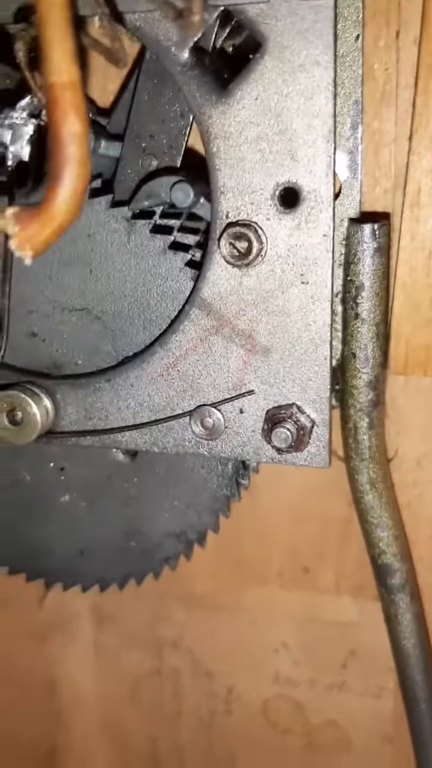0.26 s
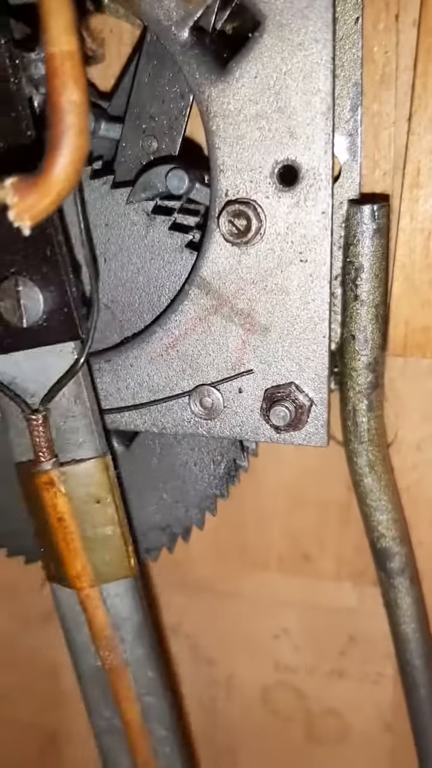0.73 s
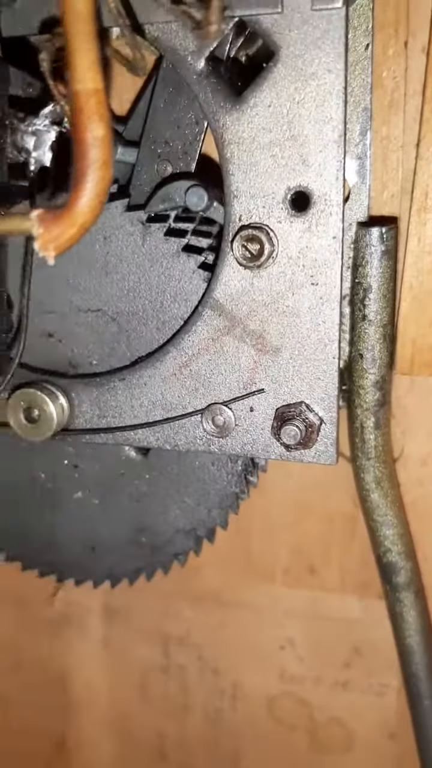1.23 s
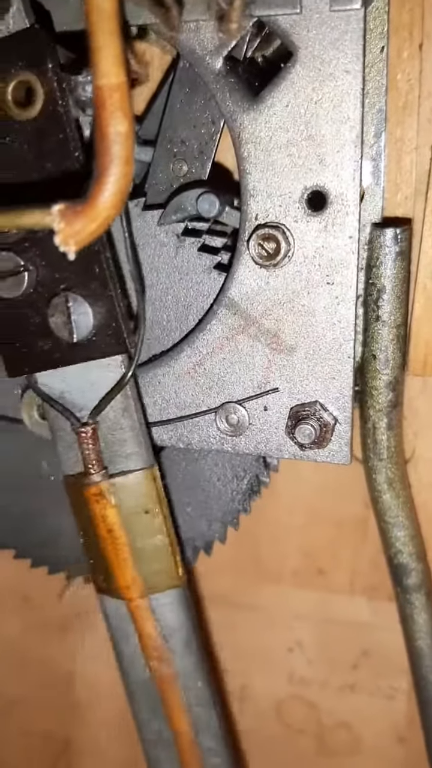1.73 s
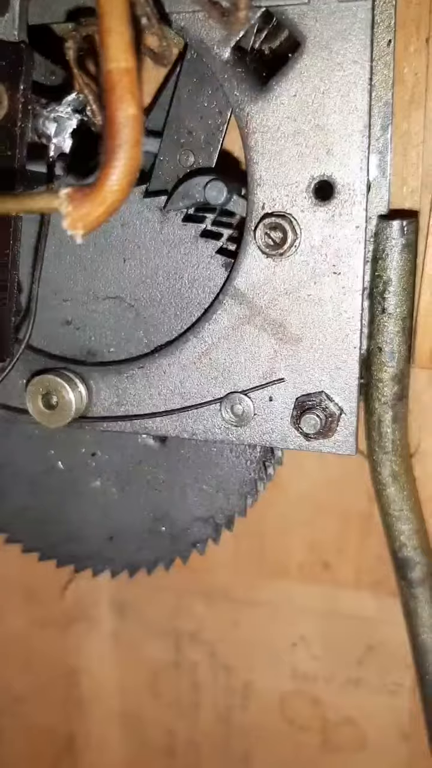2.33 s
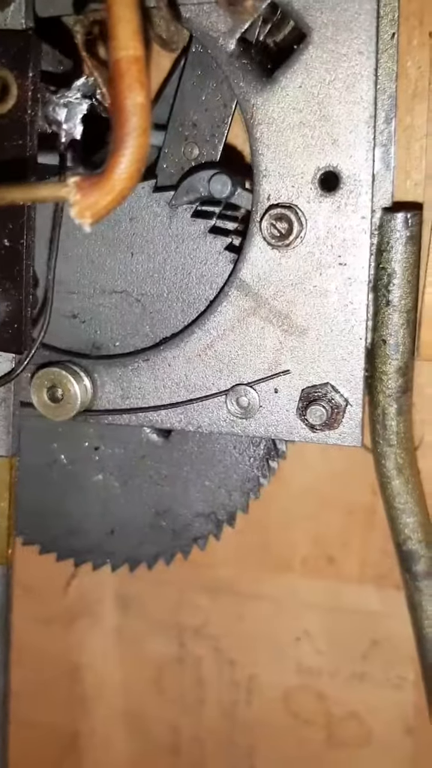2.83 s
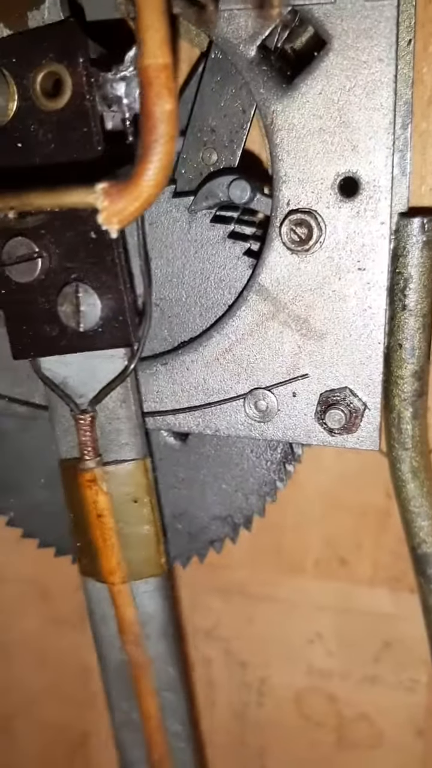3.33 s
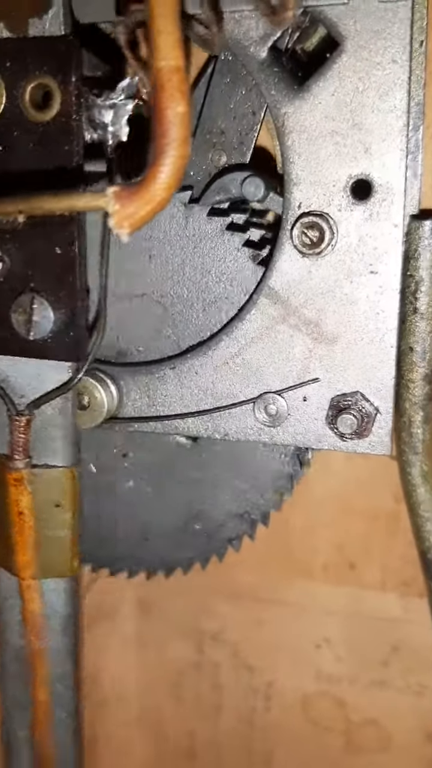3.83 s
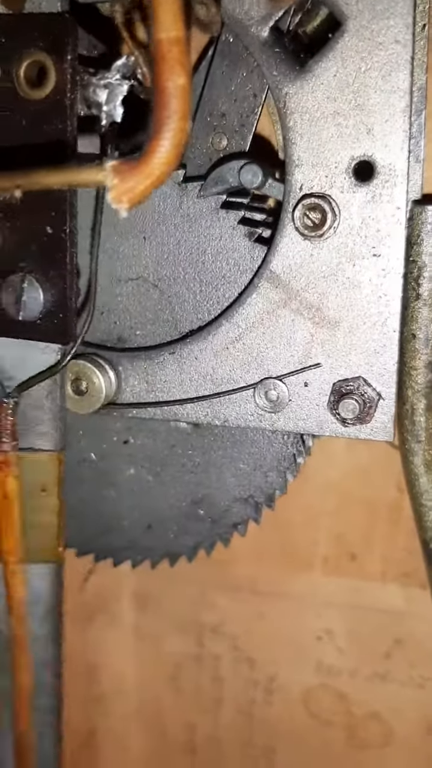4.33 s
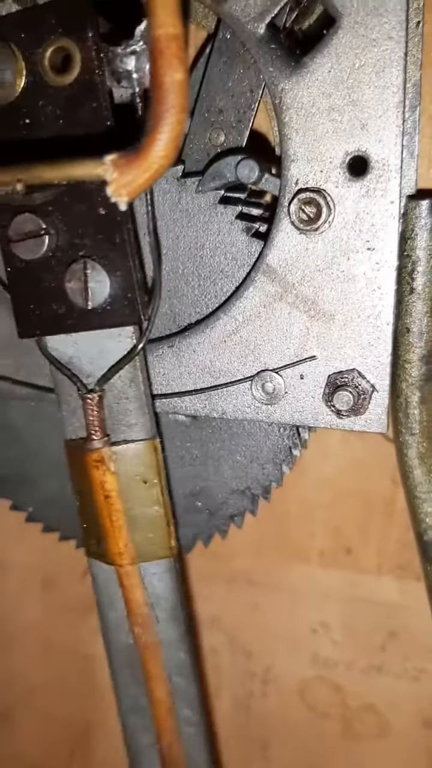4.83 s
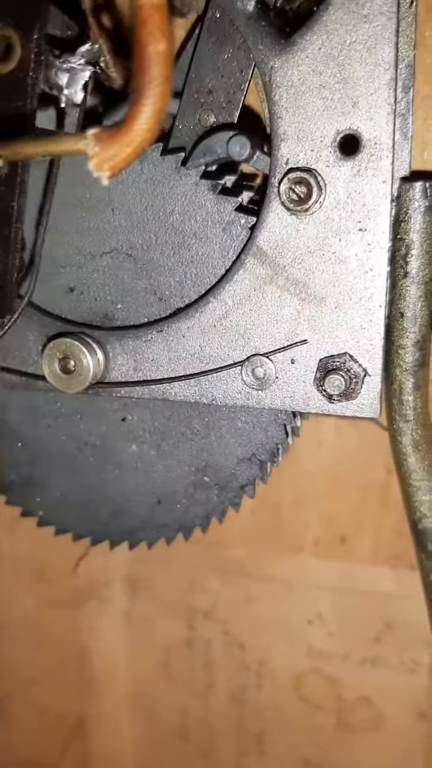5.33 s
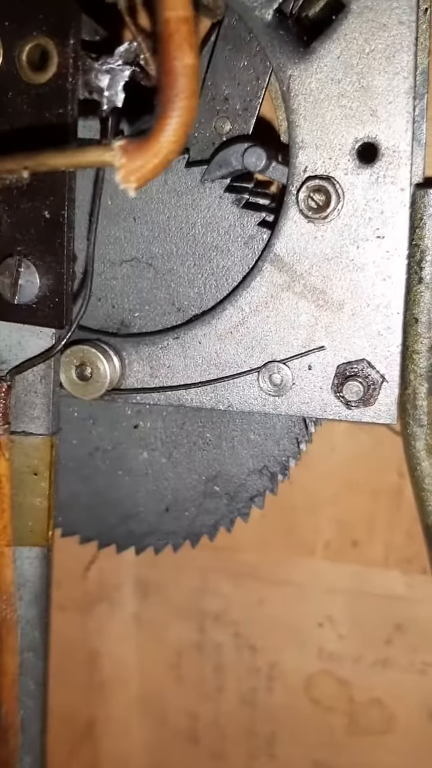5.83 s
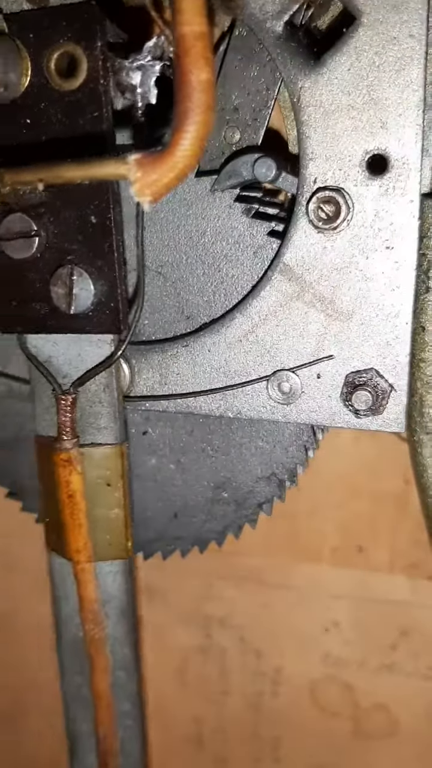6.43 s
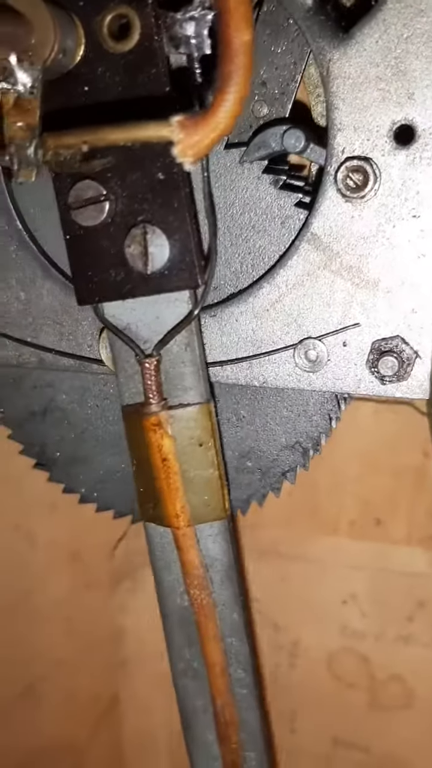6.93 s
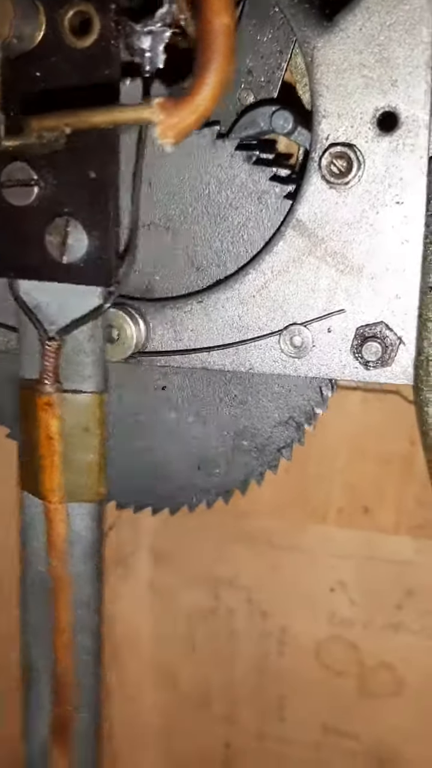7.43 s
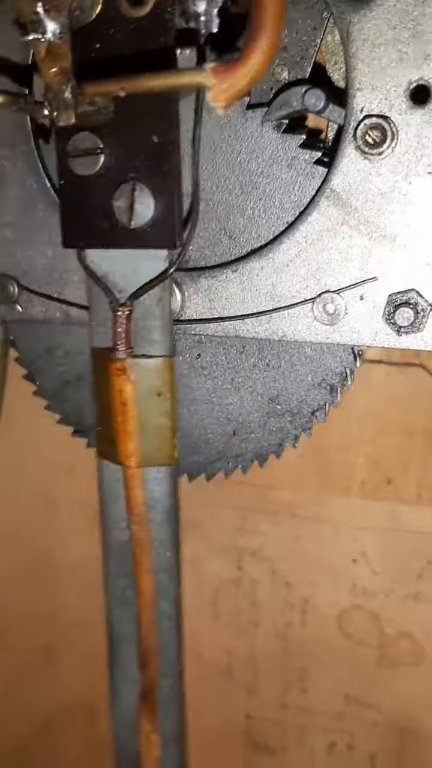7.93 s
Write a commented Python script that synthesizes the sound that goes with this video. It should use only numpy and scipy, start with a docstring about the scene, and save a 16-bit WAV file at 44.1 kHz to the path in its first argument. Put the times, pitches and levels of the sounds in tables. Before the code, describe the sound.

A clock mechanism of steel levers on a wooden backboard, heard very close with a short room answer. Light clicks, hollow tocks, low case booms and high pawl pings fall irregularly over constant airy hiss. Other clocks tick faintly behind. Sparse at first, busier after two seconds, dominated by three sharp cracks between three and four and a half seconds, then sparse again near the end.

```python
"""First a steady hiss and the short scrape of an arm, with a quick clock ticking faintly across the room.
Then an old electric pendulum clock, close up: levers click on steel and knock the wooden backboard, the case
scuffs and booms, hollow tocks come through, a pawl snaps and pings, and an arm clacks on its stop and rattles.
Noisy contact forces or brief blows ring banks of resonances; the ping and the booms are decaying sines.
Two microphones hear it all, with three other clocks beating across the room and furthest works whispering."""
import sys
import numpy as np
from scipy import signal
from scipy.fft import rfft, irfft, next_fast_len
from scipy.io import wavfile
from scipy.ndimage import map_coordinates

SR = 44100
rng = np.random.default_rng(int(sys.argv[2]) if len(sys.argv) > 2 else 0)


def wrap_up_sound(samples):
    """Save the sound to the file named by the first command line argument, as 16-bit audio."""
    columns = np.atleast_2d(samples).T
    # keep every value between -1 and 1, then stretch to whole-number steps
    tamed = np.clip(columns, -1, 1)
    steps = np.round(tamed * 32767).astype(np.int16)
    wavfile.write(sys.argv[1], SR, steps)


N = 360297
T = np.arange(SR // 3) / SR  # time within one sound (s)

# Room air and microphone hiss. Each row: frequency in Hz, relative density in dB.
HISS_SPECTRUM = [(25, -20), (100, -14), (260, -11.5), (450, -8), (590, 1.5), (700, -4.5), (1250, 1.5),
                 (1470, 0), (1550, 9), (1640, 1), (2150, 5.5), (2900, 3), (5700, 4), (7600, -1),
                 (8830, -12.5), (12500, -9.5), (15800, -8.5)]
# Balance of the hiss between the microphones. Each row: frequency in Hz, left minus right in dB.
HISS_BALANCE = [(60, 0), (200, -10), (400, -3.5), (1300, -7.5), (2400, -6.5), (4400, -10), (8100, -4.5),
                (15000, -2.5)]
# Balance of the contacts between the microphones. Each row: frequency in Hz, left minus right in dB.
CONTACT_BALANCE = [(130, -1.5), (230, -3), (420, 3.5), (1000, -5.5), (2000, -7), (4200, -11.5), (8500, -1),
                   (13000, -4.5)]
# Likeness of the two microphones. Each row: frequency in Hz, correlation from -1 to 1.
MIC_LIKENESS = [(60, 0.7), (200, 0.95), (420, 0.72), (750, 0.4), (1300, -0.35), (2400, 0.036),
                (4400, -0.056), (15000, -0.036)]
# Scrapes: the arm, and at 6.613 s and 6.74 s the pawl sliding on after its drops. Each row: start in seconds,
# level in dB, length in seconds, brightness in dB.
SCRAPES = [(0, -34, 0.05, 4.5), (2.074, -32, 0.045, 7.5), (6.613, -44, 0.02, 14), (6.74, -44.5, 0.019, 35),
           (7.414, -35, 0.059, 7), (8.047, -42, 0.038, 2.5)]
# Resonances of the scraping parts. Each row: frequency in Hz, width in Hz, level in dB.
SCRAPE_MODES = [(363, 66, -3), (556, 58, 0), (806, 360, -8.5), (1294, 72, -3), (1514, 30, 3), (2050, 200, -26)]
# Ticks of the quick clock. Each row: frequency in Hz, width in Hz, level in dB.
QUICK_MODES = [(1525, 59, 10.5), (2438, 38, 16.5), (2640, 13, 9.5), (3433, 40, 15), (3630, 2000, 1.5),
               (5520, 340, 7), (5910, 53, 15.5), (7290, 160, 8), (7920, 65, 9)]
# Steel works heard from afar. Each row: frequency in Hz, width in Hz, level in dB.
FAR_MODES = [(1535, 63, 7.5), (2070, 570, 9.5), (4020, 1000, 7.5), (5700, 990, 11)]
# Ticks of the small clock. Each row: frequency in Hz, width in Hz, level in dB.
SMALL_MODES = [(1534, 13, 17), (3520, 77, 4), (5800, 710, 5)]
# Whispers of the furthest works. Each row: start in seconds, level in dB.
WHISPERS = [(0.68, -45), (1.3, -41), (1.54, -42.5), (1.73, -43), (1.839, -43), (2.28, -42.5), (2.35, -42),
            (2.586, -44), (4.485, -38.5), (4.869, -44), (6.19, -44.5), (7.09, -49), (7.91, -41)]
# Low booms of the back panel. Each row: start in seconds, level in dB, note in Hz, length in seconds.
BUMPS = [(0.049, -34, 205.5, 0.066), (0.157, -41.5, 220, 0.11), (0.316, -48, 228, 0.09),
         (0.393, -37, 120, 0.056), (2.232, -48.5, 203, 0.058), (3.757, -27, 169, 0.055),
         (4.007, -43, 214, 0.071), (4.381, -33, 119.5, 0.065), (4.405, -37, 208, 0.055),
         (4.571, -41, 203, 0.087), (5.379, -41.5, 199, 0.083), (5.661, -34.5, 178, 0.064),
         (7.263, -66, 203, 0.12), (7.58, -40, 230, 0.071), (7.689, -50, 205, 0.1), (7.787, -41, 208, 0.1)]
# Resonances of the wooden case. Each row: frequency in Hz, width in Hz, level in dB.
CASE_MODES = [(53.6, 6.5, -8.5), (92.5, 21, -5), (123, 15.4, 1.5), (183, 28.7, 5.5), (211.7, 43.3, 4.5),
              (244.5, 24.7, 1), (281.7, 9.2, -5), (346.7, 67, 1.5), (502.5, 9.7, -7.5)]
# Resonances of the backboard. Each row: frequency in Hz, width in Hz, level in dB.
BOARD_MODES = [(574, 65, 11), (694, 72, 5), (770, 132, 7.5), (868, 87, 10), (944, 26, 5), (1172, 95, 3.5),
               (1311, 29, 8.5), (1488, 61, 8), (1562, 36, 5.5), (1940, 300, -1), (2280, 74, -6),
               (2830, 110, -2.5)]
# What a light touch stirs in case and board. Each row: frequency in Hz, gain in dB.
LIGHT_TOUCH = [(80, -4), (125, -0.5), (170, -2.5), (220, 3), (300, -0.5), (420, -3), (600, 2.5),
               (1550, 0.5), (2100, -1), (3500, 8)]
# Lever contacts, and at 2.113 s and 7.469 s the scraping arm coming to rest. Each row: start in seconds, #
# steel click in dB, board knock in dB, case thud in dB, knock brightness in dB, time to the rebound in seconds.
CONTACTS = [(0.157, -51, -51, -46, -7, 0.0062), (0.386, -37, -35.5, -32.5, -6.5, 0.0067),
            (0.785, -50, -40.5, -41, 5, 0.0048), (1.7918, -45.5, -42, -40.5, -8.5, 0.0064),
            (2.077, -62, -54, -49, 14, 0.0089), (2.113, -60, -54, -49, -21, 0.018),
            (2.211, -51, -48, -54, 1, 0.0094), (2.492, -27, -31.5, -39, 0.5, 0.0051),
            (2.503, -32, -47, -39.5, 0, 0.0086), (2.529, -52, -41, -30.5, -11, 0.011),
            (2.5497, -43, -29, -37, 1, 0.0045), (2.56, -37, -32, -38, -9, 0.0065),
            (2.591, -50, -45, -42.5, 5, 0.0058), (3.0844, -36, -34.5, -36.5, 7, 0.0044),
            (3.0919, -36.5, -36, -36, -17, 0.0044), (3.7506, -28, -28.5, -31.5, -2, 0.0027),
            (3.8, -49, -42, -39, 8, 0.0062), (3.819, -56, -38.5, -37.5, -12, 0.0059),
            (3.836, -60, -37, -36, -17, 0.014), (3.904, -51, -58, -38, -8, 0.019),
            (3.991, -55, -47, -55, -1, .012), (4.3776, -27, -30, -32.5, -9, 0.006),
            (4.963, -46.5, -37.5, -36.5, -2.5, 0.0064), (5.376, -64, -53, -70, -12, .012),
            (5.574, -21, -27.5, -29.5, -4, 0.005), (5.589, -33, -32, -34, -3, 0.0035),
            (5.626, -32.5, -31.5, -32, -6, 0.0027), (5.637, -36, -29.5, -44, -7, .005),
            (5.687, -31.5, -36.5, -36.5, 0, 0.0058), (5.699, -52, -36.5, -32, -2, 0.0066),
            (5.762, -47, -59, -45, -8, .012), (7.469, -47, -41.5, -47, -11, 0.01),
            (7.575, -51, -45.5, -49, -2, 0.011), (7.873, -40, -34.5, -35.5, 2, 0.0078)]
# Resonances of the steel frame. Each row: frequency in Hz, width in Hz, level in dB.
FRAME_MODES = [(2340, 520, 7.5), (2700, 65, 9), (3870, 375, 13.5), (4650, 240, 13.5), (5410, 610, 12.5),
               (6660, 650, 13.5), (7500, 1660, 8), (11400, 400, -12), (10700, 930, -24), (13300, 1600, 2),
               (14400, 490, 6.5)]
# What the board radiates of a knock. Each row: frequency in Hz, gain in dB.
BOARD_RADIATION = [(450, -4.0), (800, 3.0), (1250, 5.5), (1600, 5.5), (2300, 1.0), (5000, 11)]
# Soft scuffs of the case. Each row: start in seconds, board level in dB, case level in dB, length in seconds.
SCUFFS = [(0.335, -53, -46.5, 0.05), (1.037, -56, -49, 0.041), (1.449, -46.5, -50, 0.089),
          (1.864, -54.5, -47.5, 0.063), (2.758, -61, -49.5, 0.089), (3.21, -47.5, -40, 0.041),
          (3.282, -45, -43, 0.067), (3.801, -45, -41, 0.06), (3.91, -47.5, -47, 0.04),
          (4.548, -50, -44.5, 0.054), (5.486, -42.5, -47, 0.081), (5.65, -49, -42, .055),
          (5.748, -59, -42, 0.066), (5.926, -58, -41, 0.035), (5.973, -43.5, -55.5, 0.027),
          (6.089, -50.5, -38.5, 0.083), (6.329, -57, -50.5, 0.043), (7.438, -42.5, -41.5, 0.082),
          (8.086, -44.5, -46.5, 0.066)]
# Soft hollow tocks. Each row: start in seconds, level in dB.
TOCKS = [(0.516, -48.5), (1.439, -39.5), (3.485, -50.5), (5.485, -45), (6.55, -51.5), (7.073, -64)]
# Resonances of the tocks. Each row: frequency in Hz, width in Hz, level in dB.
HOLLOW_MODES = [(193, 13, -6.5), (396, 34, -1.5), (509, 180, 2), (530, 87, 5.5)]
# Pawl drops. Each row: start in seconds, snap in dB, ring in dB, freedom to ring from 0 to 1.
PAWL_DROPS = [(1.964, -49, -51, 0.4), (2.2202, -31, -35.5, 0.87), (2.757, -64, -38, 0.1),
              (3.3407, -44, -32.5, 0.14), (4.0329, -31.5, -33, 0.5), (4.6118, -41.5, -28, 0.2),
              (5.206, -31, -39, 1), (6.62, -51, -30, 0.34), (6.756, -61, -46, 0.6), (7.599, -38, -41, 0.8),
              (8.118, -47, -51, .8)]
# Resonances of the pawl's snap. Each row: frequency in Hz, width in Hz, level in dB.
SNAP_MODES = [(4370, 4600, 3), (6150, 540, 19), (6670, 580, 23.5), (8100, 1900, 10.5), (9470, 110, 23),
              (14700, 400, -14), (15300, 600, 5)]
# Partials of the pawl's ring. Each entry: frequency in Hz.
RING_HZ = [7600, 9000, 12398, 13622, 13847]
# Strength of those partials, in the same order. Each row: level in dB, t60 in seconds when free.
RING_PARTIALS = [(-11, 0.1), (-1, 0.12), (-5.5, 0.26), (-1, 0.076), (5, 0.063)]
# The arm falls on its stop. Each row: start in seconds, clack peak in dB, case thud in dB.
CLACKS = [(3.1156, -9, -35.5), (3.7613, -8, -32.5), (4.4626, -8.5, -39)]
# Resonances of the stop. Each row: frequency in Hz, width in Hz, level in dB.
STOP_MODES = [(376, 70, -4.5), (607, 28, 2), (800, 67, 6.5), (930, 41, -5), (1130, 37, -11),
              (1270, 630, 1.5), (1310, 43, 9.5), (1485, 62, 9), (2100, 81, 2)]
# Colour of the rattling taps. Each row: frequency in Hz, gain in dB.
RATTLE_COLOUR = [(1700, -9.0), (6000, -1)]
# How long the room lingers. Each row: frequency in Hz, t60 in seconds.
ROOM_T60 = [(100, 0.66), (230, 0.48), (400, 0.35), (1500, 0.2), (6000, 0.14), (14000, 0.15)]
# Colour of the treble. Each row: frequency in Hz, gain in dB.
TREBLE_COLOUR = [(7600, -0.5), (8800, -10.0), (10000, -3.5), (11500, 3.0)]

HISS_DB, HISS_WAVER_DB = -45, 1
SCRAPE_GROWTH_DB = 1.5  # from the start of a scrape to its end
# first tick (s) and beat (s) of the three clocks across the room
QUICK_BEAT, SLOW_BEAT, SMALL_BEAT = (.025, .2772), (.074, .6685), (.5, .4995)
QUICK_DB, SLOW_DB, SMALL_DB = -40, -42.5, -53
TICK_SCATTER_DB, TICK_COLOUR_DB = 2.1, 3.5  # from tick to tick: its level, and each resonance
BOOM_WANDER_DB = 2.2  # drives the phase of the boom, 0.115 rad for each dB
BOOM_CASE_DB, BOOM_BOARD_DB = -2.5, -10.5  # case and board against the panel
REBOUND_DB = -11.5  # a lever's second touch against its first
SCUFF_BRIGHT_DB, BRIGHT_PER_DB = 3.5, 1.4  # a scuff is brighter the more of it goes into the board
CASE_LAG = .3  # the heavy case gives way after the board, as a share of the scuff's length
PAWL_CLICK_DB = -17  # the bare click of the tip against the snap
# the slide after each drop: delay, levels against the snap, length
SLIDE_S, SLIDE_BOARD_DB, SLIDE_CASE_DB, SLIDE_LENGTH_S = .008, -13, -16, 0.18
BOUNCE_S, BOUNCE_DB = 0.0059, -5  # the arm's single bounce
STOP_CONTACT_S, STOP_GRIT_DB = 0.00052, -30  # length of the blow; grit of the metal faces
STOP_LEFT_DB, STOP_LEFT_LAG_S = -12.5, 0.00311  # the left microphone hears it by way of the backboard
RATTLE_S, RATTLE_DB, RATTLE_FALL_DB_PER_S = 0.11, -36, 95  # length, level against the clack, decay
ROOM_DB = -6.5  # the room's answer against the direct sound
TOP_HZ = 15900  # nothing is heard above


def amp(db):
    """Decibels to gain."""
    return 10 ** (np.asarray(db) / 20)


def along(points, hz):
    """(Hz, value) points read on a log frequency axis."""
    f, v = np.transpose(points)
    return np.interp(np.log(hz + 1), np.log(f + 1), v)


def fade(t, t60):
    """Exponential decay, 60 dB down at t60."""
    return np.exp(-np.log(1000) * t / t60)


def filtered(x, response):
    """x times a complex response of frequency."""
    n = x.shape[-1]
    m = next_fast_len(n + SR // 8)
    spectrum = rfft(x, m) * response(np.fft.rfftfreq(m, 1 / SR))
    return irfft(spectrum, m)[..., :n]


def resonate(x, modes):
    """x through a body's (Hz, width, dB) resonances, neighbours in opposite polarity."""
    def body(f):
        return sum((-1) ** k * amp(db) * 1j * f * width / (hz * hz - f * f + 1j * f * width)
                   for k, (hz, width, db) in enumerate(modes))

    return filtered(x, body)


def ports(x, tilt):
    """Two unrelated signals as two microphones hear them: most alike in the bass, balanced by tilt."""
    def angle(hz):
        return np.arccos(np.clip(along(MIC_LIKENESS, hz), -1, 1)) / 2

    mid = filtered(x[..., :1, :], lambda hz: np.cos(angle(hz)))
    side = filtered(x[..., 1:, :], lambda hz: np.sin(angle(hz)))
    both = np.concatenate([mid + side, mid - side], axis=-2)
    return filtered(both, lambda hz: amp(np.outer([1, -1], along(tilt, hz)) / 2))


def strike(force, modes, bright_db=0):
    """One stereo sound per row of force: rough contact rings the body, with the energy of 20 ms at 0 dB."""
    chatter = rng.standard_normal((len(force), 2, len(T))) * force[:, None]

    def hardness(hz):
        # a harder contact favours the resonances above 1.1 kHz
        return amp(np.reshape(bright_db, (-1, 1, 1)) * np.tanh((hz - 1100) / 250) / 2)

    sound = resonate(filtered(ports(chatter, CONTACT_BALANCE), hardness), modes)
    energy = np.sum(sound ** 2, axis=(1, 2), keepdims=True) / 2
    return sound / np.sqrt(energy / (.02 * SR))


def blows(times, rise, t60):
    """The same force envelope for each of the times; rise and t60 in seconds."""
    return np.tile((1 - np.exp(-T / rise)) * fade(T, t60), (len(times), 1))


def place(times, levels_db, sounds):
    """Lay stereo sounds out in time."""
    track = np.zeros((2, N + SR))
    for s, db, sound in zip(times, levels_db, sounds):
        start = int(np.clip(s * SR, 0, N))
        track[:, start:start + len(T)] += amp(db) * sound
    return track[:, :N]


def uneven(force, rate, depth_db):
    """Surfaces catch and slip: the force wanders between random levels, rate of them a second."""
    knots = rng.standard_normal((len(force), len(T) // 20))
    wander = np.array([np.interp(T * rate, np.arange(len(k)), k) for k in knots])
    return force * amp(depth_db * wander)


def varied(modes, count, level_db, spread=0):
    """Each blow lands elsewhere: count copies of the resonances, shifted in level and pitch."""
    chance = rng.standard_normal((count, len(modes), 2, 1, 1))
    return [(hz * (1 + spread * chance[:, k, 0]), width, db + level_db * chance[:, k, 1])
            for k, (hz, width, db) in enumerate(modes)]


def rub(s, db, length, modes, bright_db=0, swell=0.84):
    """Slow rubbing contacts swell and fade in a body, with no click; a higher swell peaks later."""
    u = T / np.clip(length * np.ones(len(s)), .01, .2)[:, None]
    force = uneven(u ** swell * np.exp(-5 * u), rate=145.4, depth_db=5.5)
    rubbed = place(s, db, strike(force, modes, bright_db))
    return filtered(rubbed, lambda hz: amp(along(LIGHT_TOUCH, hz)))


def hiss():
    """Room air and microphone hiss: shaped noise whose level wavers slightly."""
    noise = ports(rng.standard_normal((2, N)), HISS_BALANCE)
    air = filtered(noise, lambda hz: amp(along(HISS_SPECTRUM, hz)))
    # a smooth curve through one random level every 4000 samples
    waver = map_coordinates(rng.standard_normal(N // 4000 + 2), [np.arange(N) / 4000])
    return amp(HISS_DB + HISS_WAVER_DB * waver) * air / np.std(air)


def scrapes():
    """The arm, or the pawl after a drop, drags with slightly uneven pressure, a little harder towards the end,
    then lets go."""
    s, db, length, bright_db = np.transpose(SCRAPES)
    u = T / np.clip(length, .01, .2)[:, None]
    growth = amp(SCRAPE_GROWTH_DB * np.minimum(u, 1))
    pressure = growth * np.clip(12 * u, 0, 1) * np.clip(6 * (1 - u), 0, 1)
    return place(s, db, strike(uneven(pressure, rate=422, depth_db=0.5), SCRAPE_MODES, bright_db))


def ticking(beat, db, modes, rise, t60):
    """A clock keeps its beat; each tick has its own colour, and distance smears it."""
    first, period = beat
    s = np.arange(first, N / SR, period)
    ticks = strike(blows(s, rise, t60), varied(modes, len(s), TICK_COLOUR_DB))
    return place(s, db + TICK_SCATTER_DB * rng.standard_normal(len(s)), ticks)


def other_clocks():
    """Three clocks tick at their own rates; the furthest works only whisper now and then."""
    quick = ticking(QUICK_BEAT, QUICK_DB, QUICK_MODES, rise=0.007, t60=0.08)
    slow = ticking(SLOW_BEAT, SLOW_DB, FAR_MODES, rise=.02, t60=0.094)
    small = ticking(SMALL_BEAT, SMALL_DB, SMALL_MODES, rise=0.011, t60=0.035)
    s, db = np.transpose(WHISPERS)
    whispers = place(s, db, strike(blows(s, rise=0.04, t60=0.18), FAR_MODES))
    return amp([[-1], [1]]) * (quick + slow + small + whispers)  # left and right, dB


def bumps():
    """A soft push sets the back panel booming on an unsteady note; the case and board shake with it."""
    s, db, hz, length = np.transpose(BUMPS)
    u = T / length[:, None]
    swell = u ** 0.95 * np.exp(-3.9 * u)
    phase_wander = np.log(uneven(np.ones_like(u), rate=73, depth_db=BOOM_WANDER_DB))
    boom = np.sin(2 * np.pi * hz[:, None] * T + phase_wander) * swell / swell.max()
    panel = amp([[-1], [1]]) * place(s, db, uneven(boom, rate=139, depth_db=3.5))
    case = rub(s, db + BOOM_CASE_DB, 0.98 * length, CASE_MODES)
    board = rub(s, db + BOOM_BOARD_DB, length, BOARD_MODES, bright_db=3)
    return panel + case + board


def levers():
    """Levers, and the arm as it comes to rest: the board's knock rises fastest, the steel click next, the heavy
    case last; each contact rebounds once."""
    s, click_db, knock_db, thud_db, bright_db, rebound = np.transpose(CONTACTS)
    board = varied(BOARD_MODES, len(s), level_db=5, spread=0.0033)

    def touch(at):
        """One touch of every lever."""
        click_force = uneven(blows(at, rise=0.00093, t60=0.05), rate=640, depth_db=5.5)
        knock_force = uneven(blows(at, rise=0.00026, t60=0.046), rate=425, depth_db=5)
        thud_force = uneven(blows(at, rise=0.0017, t60=0.13), rate=86, depth_db=5.5)
        click = place(at, click_db, strike(click_force, FRAME_MODES))
        knock = place(at, knock_db, strike(knock_force, board, bright_db))
        thud = place(at, thud_db, strike(thud_force, CASE_MODES))
        return click + filtered(knock, lambda hz: amp(along(BOARD_RADIATION, hz))) + thud

    return touch(s) + amp(REBOUND_DB) * touch(s + rebound)


def scuffs():
    """The swinging pendulum rubs the board in a swell that fades, and nudges the case just after."""
    s, board_db, case_db, length = np.transpose(SCUFFS)
    bright_db = SCUFF_BRIGHT_DB + BRIGHT_PER_DB * (board_db - case_db)
    board = rub(s, board_db, length, BOARD_MODES, bright_db, swell=2.16)
    return board + rub(s + CASE_LAG * length, case_db, length, CASE_MODES)


def tocks():
    """Dull, hollow taps: a slowly rising rough force rings a few low resonances."""
    s, db = np.transpose(TOCKS)
    return place(s, db, strike(blows(s, rise=0.055, t60=0.16), HOLLOW_MODES))


def pawl():
    """The pawl clicks on to a tooth and rings very high, the shorter the harder it is pressed down."""
    s, snap_db, ring_db, free = np.transpose(PAWL_DROPS)
    snap = place(s, snap_db, strike(blows(s, rise=0.0023, t60=0.01), SNAP_MODES))
    tip = strike(blows(s, rise=0.00048, t60=0.0036), [(11000, 11000, 0)])
    click = place(s, snap_db + PAWL_CLICK_DB, tip)
    # each drop and microphone gets its own level and phase for every partial
    chance = rng.standard_normal((len(s), len(RING_PARTIALS), 2, 2, 1))
    free = np.clip(free, .1, 1)[:, None, None]
    ring = 0
    for k, (hz, (db, t60)) in enumerate(zip(RING_HZ, RING_PARTIALS)):
        level = amp(db + 2.1 * chance[:, k, 0])
        ring = ring + level * fade(T, t60 * free) * np.sin(2 * np.pi * (hz * T + chance[:, k, 1]))
    ping = place(s, ring_db, ring * (1 - np.exp(-T / 0.00035)))
    return snap + click + amp([[-3], [2.5]]) * ping  # the ping leans to the right


def slides():
    """After each drop the pawl slides along the next tooth, the louder the harder it dropped."""
    s, snap_db, _, _ = np.transpose(PAWL_DROPS)
    board = rub(s + SLIDE_S, snap_db + SLIDE_BOARD_DB, SLIDE_LENGTH_S, BOARD_MODES, bright_db=6)
    return board + rub(s + SLIDE_S, snap_db + SLIDE_CASE_DB, SLIDE_LENGTH_S, CASE_MODES)


def clacks():
    """The arm lands on its stop with one clean, hard crack, bounces once and shakes the case."""
    s, clack_db, thud_db = np.transpose(CLACKS)
    blow = np.sin(np.pi * np.minimum(T / STOP_CONTACT_S, 1)) ** 2
    ring = resonate(blow, STOP_MODES)

    def paths(hz):
        """Left by way of the backboard, right direct."""
        left = amp(STOP_LEFT_DB) * np.exp(-2j * np.pi * hz * STOP_LEFT_LAG_S)
        return np.array([left, np.ones(len(hz))])

    heard = filtered(ring / np.abs(ring).max(), paths)
    crack = place(s, clack_db, [heard] * len(s))
    bounce = amp(BOUNCE_DB) * place(s + BOUNCE_S, clack_db, [heard] * len(s))
    grit = place(s, clack_db + STOP_GRIT_DB, strike(blows(s, rise=0.00034, t60=0.084), [(2330, 680, 0)]))
    thud = place(s, thud_db, strike(blows(s, rise=0.0046, t60=0.15), CASE_MODES))
    return crack + bounce + grit + thud


def rattles(count=7):
    """After each clack the loose links chatter on in a few dull taps that weaken on the whole."""
    s, clack_db, _ = np.transpose(CLACKS)
    jitter = rng.uniform(-0.49, 0.418, (len(s), count))
    age = RATTLE_S * (np.arange(count) + 1 + jitter) / count
    db = clack_db[:, None] + RATTLE_DB - RATTLE_FALL_DB_PER_S * age
    db = db + 3.1 * rng.standard_normal(age.shape)
    at = (s[:, None] + age).ravel()
    taps = place(at, db.ravel(), strike(blows(at, rise=0.00041, t60=0.011), STOP_MODES, bright_db=-15))
    return filtered(taps, lambda hz: amp(along(RATTLE_COLOUR, hz)))


def room(x):
    """The room's answer: x through a tail of noise in which the bass lingers longest."""
    hz, t, z = signal.stft(rng.standard_normal((2, len(T))), SR, nperseg=256)
    tail = signal.istft(z * fade(t, along(ROOM_T60, hz)[:, None]), SR, nperseg=256)[1]
    onset = 1 - np.exp(-np.arange(tail.shape[1]) / SR / 0.0023)
    tail = ports(tail * onset, CONTACT_BALANCE)
    return signal.fftconvolve(x.mean(axis=0)[None], tail / np.linalg.norm(tail), axes=1)[:, :N]


def scene():
    """The near movement and its room answer, with booms, tocks, the other clocks and hiss."""
    movement = scrapes() + levers() + scuffs() + pawl() + slides() + clacks() + rattles()
    return hiss() + movement + amp(ROOM_DB) * room(movement) + other_clocks() + bumps() + tocks()


def record(dry):
    """The sound is thinner near 9 kHz, and nothing is heard above the band limit."""
    return filtered(dry, lambda hz: amp(along(TREBLE_COLOUR, hz)) * (hz < TOP_HZ))


dry = scene()
out = record(dry)
wrap_up_sound(out)
```